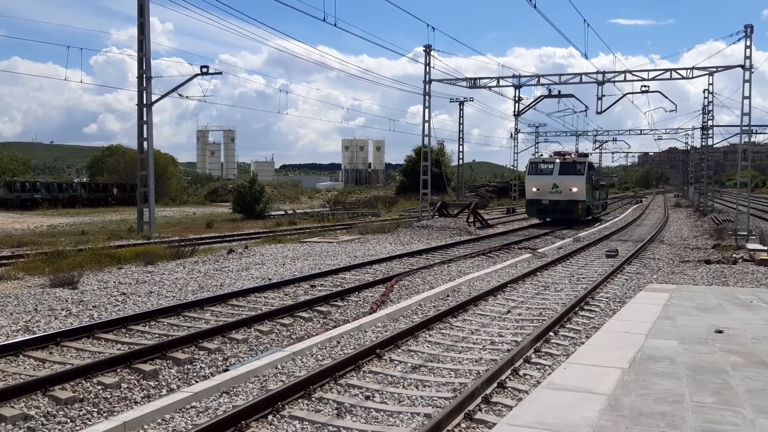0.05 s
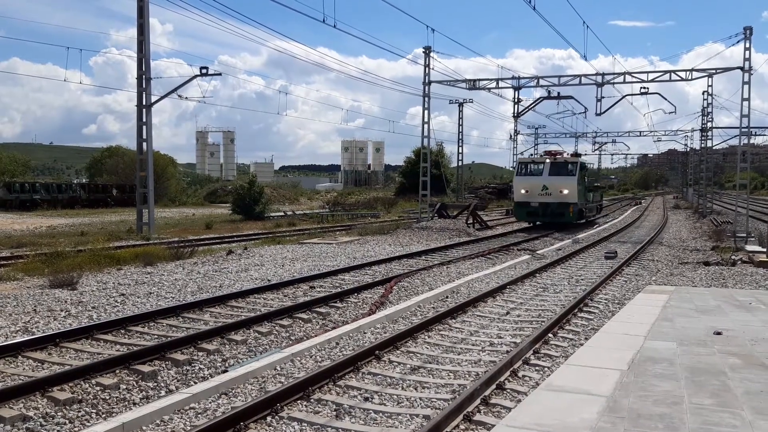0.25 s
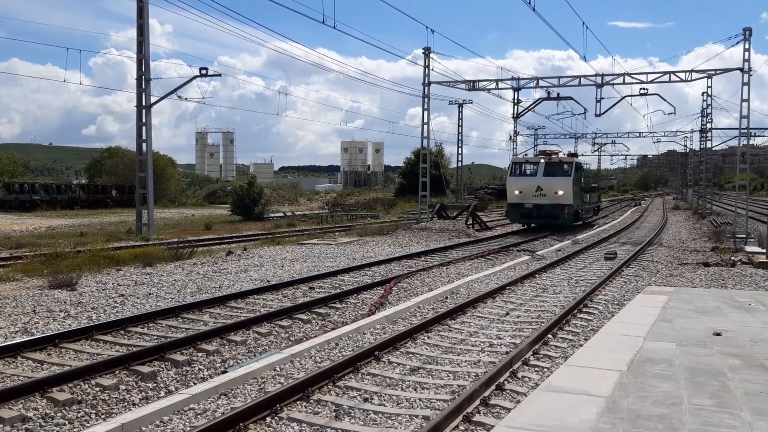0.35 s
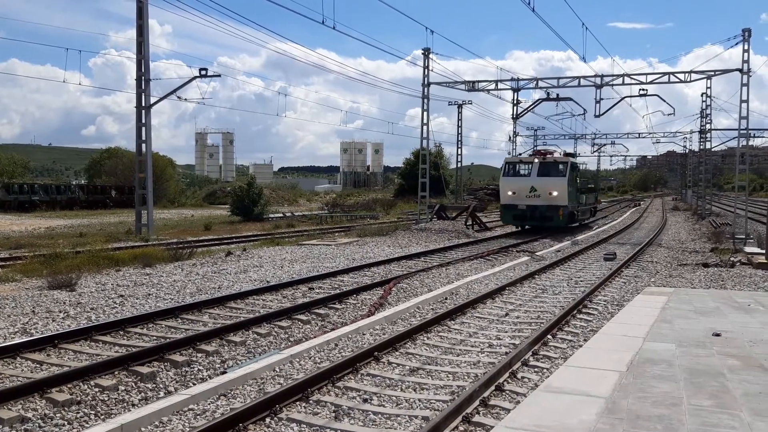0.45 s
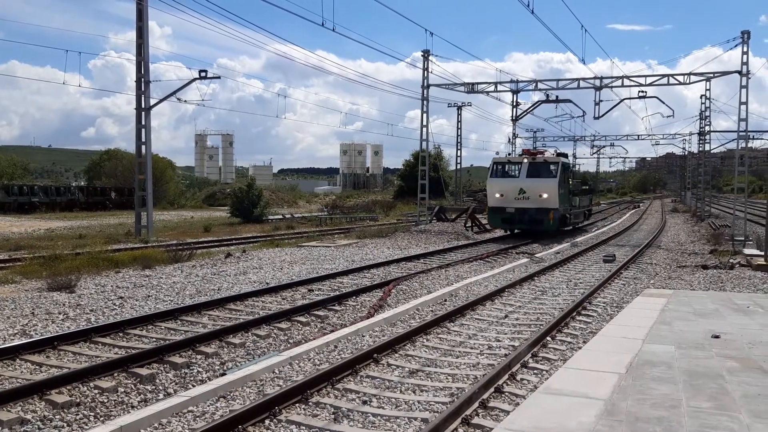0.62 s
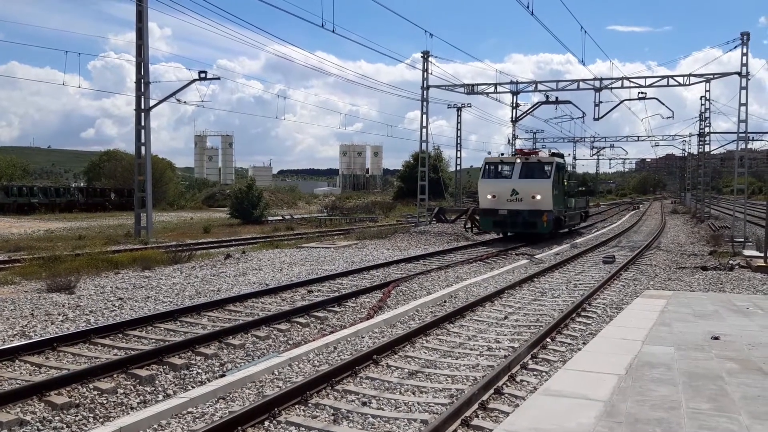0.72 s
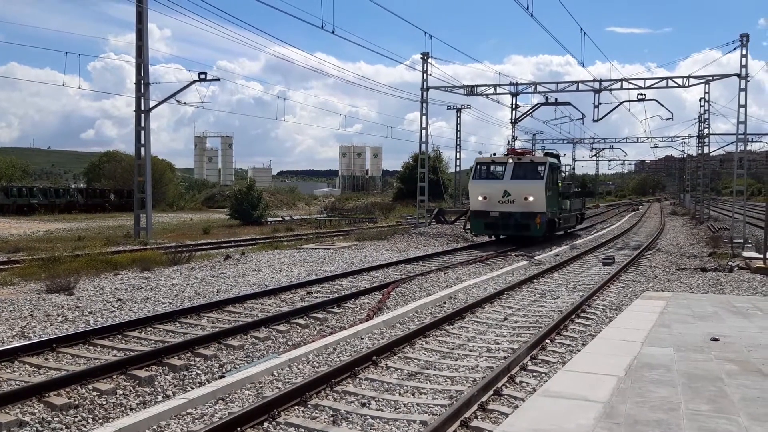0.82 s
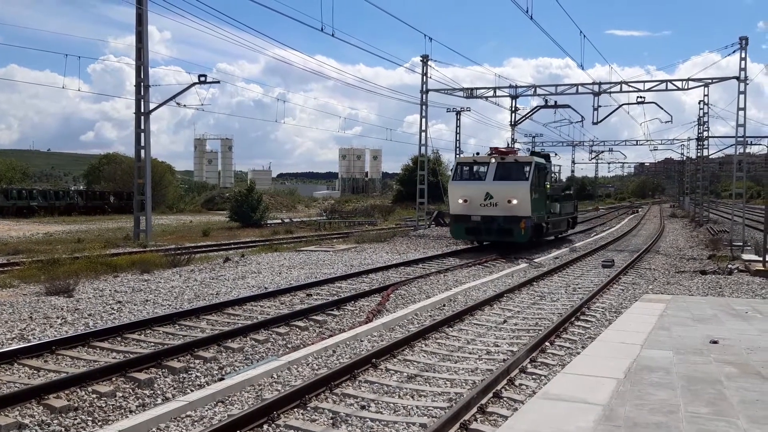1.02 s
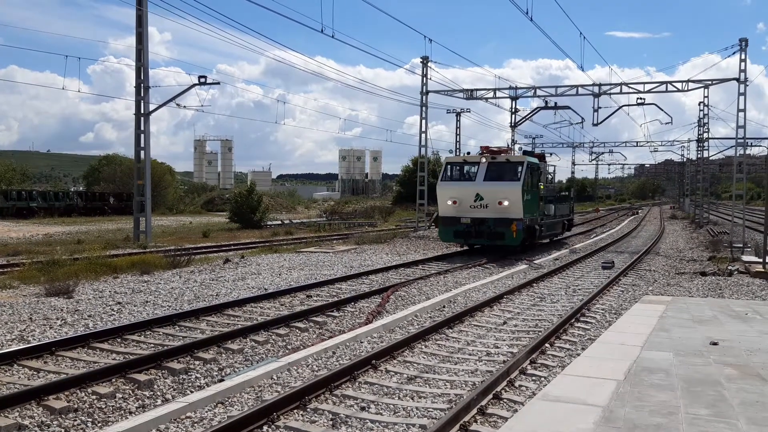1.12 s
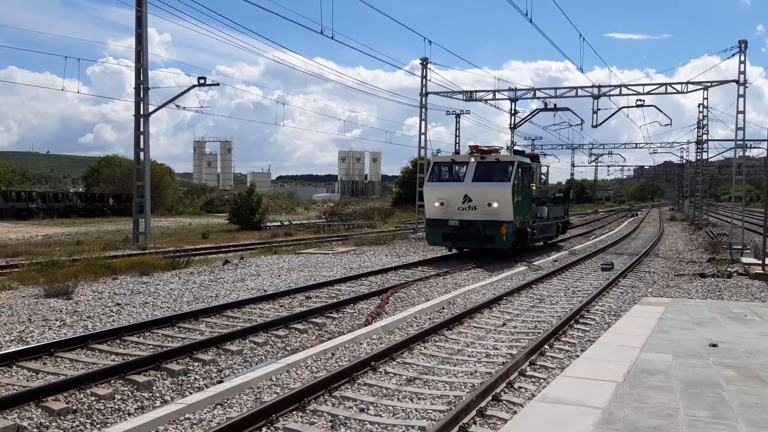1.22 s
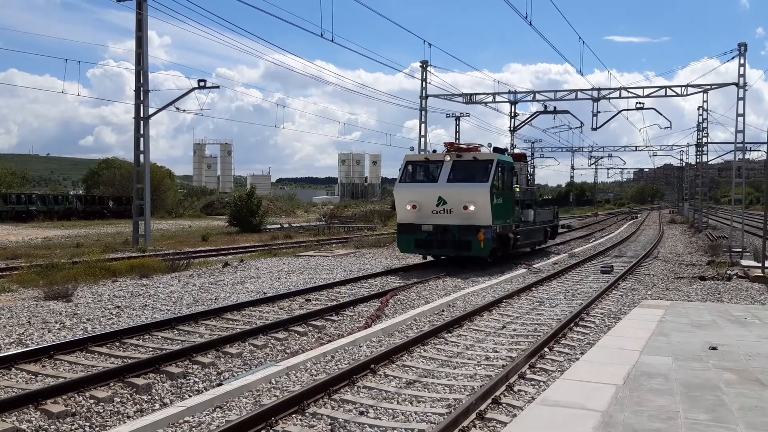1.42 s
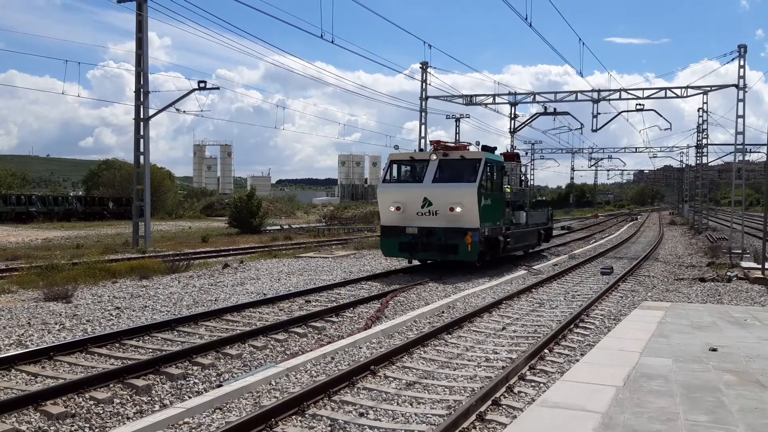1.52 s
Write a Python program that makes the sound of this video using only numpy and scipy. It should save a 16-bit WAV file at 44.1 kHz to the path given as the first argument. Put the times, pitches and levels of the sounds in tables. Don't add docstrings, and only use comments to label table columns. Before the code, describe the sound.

A rail vehicle's air horn sounds one short, loud, reedy blast over low engine hum and wheel hiss, after a faint earlier echo; its dull reverberation fades across the open yard while wind buffets the stereo microphone.

```python
import sys
import numpy as np
from scipy import signal
from scipy.fft import rfft, irfft
from scipy.io import wavfile
from scipy.ndimage import uniform_filter1d

SR = 44100
rng = np.random.default_rng(int(sys.argv[2]) if len(sys.argv) > 2 else 0)


def master_out(mix):
    frames = np.transpose(np.atleast_2d(mix))
    ceiling = np.clip(frames, -1, 1)
    pcm = np.round(ceiling * 32767).astype(np.int16)
    wavfile.write(sys.argv[1], SR, pcm)


def magnitude_from_level(level_db):
    exponent = np.asarray(level_db, float) / 20
    return 10 ** exponent


N = 68355
T = np.arange(-SR, N) / SR
HEARD_T = T[SR:]

# time in seconds, wheel hiss in dB, engine in dB.
APPROACH = [(0, -3, -8.5), (.2, 1, -4), (.4, -3, -9), (.62, 3, 0), (.72, 4, 3.5), (.85, 1, -1.5),
            (1.0, 1, 1.5), (1.1, -1.5, 0.5), (1.18, -1.5, -3), (1.28, 2.5, 0), (1.55, 4, 1.5)]


def drift(hz, size):
    r, run_in = np.exp(-2 * np.pi * hz / SR), 8000
    x = signal.lfilter([1], [1, -2 * r, r * r], rng.standard_normal(size + run_in))[run_in:]
    return (x - x.mean()) / x.std()


def along(rows, t):
    s, *columns = np.transpose(rows)
    return [np.interp(t, s, column) for column in columns]


def both_ports(left_db, right_db):
    return magnitude_from_level([[left_db], [right_db]])


def lowpass(order, hz, x):
    return signal.sosfilt(signal.butter(order, hz, fs=SR, output="sos"), x)


def horn(delay=0, ratio=1, direct=0, count=7):
    # time in seconds, pitch in Hz, pressure in dB.
    air_supply = [
        (.198, 708.7, -31),
        (.212, 708.4, -5.5),
        (.232, 721.4, -1.5),
        (.27, 709.4, -1),
        (.42, 706.7, -1),
        (.5, 711, -3),
        (.57, 722.4, -8.5),
        (.62, 725, -14),
        (.675, 665.7, -30),
    ]
    # multiple of the pitch, left in dB,
    # right in dB, steered share 0-1.
    partials = [(1, -12, -6.5, 0.47), (2, -16, -23, .8), (3, -13.5, -1.5, 0.52), (4, -25, -16.5, .1),
                (5, -21, -20.5, 0.7), (6, -30, -17.5, 0.07), (7, -26, -13, 0.27),
                (8, -28, -12, 0), (9, -47, -38, 0), (10, -40, -50, 0), (11, -36, -46, 0),
                     (12, -47, -74, 0), (13, -48, -55, 0), (14, -51, -47, 0), (15, -46, -47, 0),
                     (16, -46, -42, 0), (17, -48, -39, 0), (18, -50, -39, 0), (19, -52, -40, 0),
                     (20, -53, -45, 0), (21, -54, -51, 0), (22, -56, -51, 0)]
    # time in seconds, left in dB, right in dB.
    steering = [(.205, 9.5, -43), (.22, 1, -58), (.245, 1.5, -11), (.28, 2.5, -3), (.33, -2.5, 0),
                (.6, 5, 4)]
    # multiple of the pitch, fade in dB per second.
    ground_fades = [(4, 2), (5, -1), (6, 31.5), (7, 14), (8, 10), (9, 7), (10, 59), (12, 28), (14, 73)]
    # multiple of the pitch, left in dB, right in dB, fade in dB per second.
    side_tones = [(1.25, -56, -35, 50.5), (1.75, -40.5, -36.5, 9), (2.25, -49, -51, 17.5),
                  (2.75, -37, -50, 19), (3.25, -42.5, -45, 25)]
    left_lag_rad, high_partials_db, flutter_wide_hz = 0.37, -1, 23.8

    t = (T - delay - .2) * ratio + .2
    end_s = air_supply[-1][0] + .05
    live = (t > air_supply[0][0]) & (t < end_s)
    t, size = t[live], live.sum()
    hz, pressure_db = along(air_supply + [(end_s, 715, -70)], t)
    phase = 2 * np.pi * np.cumsum(hz * ratio) / SR
    rough = 0.011 + 0.031 * np.exp(-((t - .228) / .02) ** 2)
    steer_db = np.array(along(steering, t)) * direct
    out = np.zeros((2, size))

    for k, left_db, right_db, share in (partials)[:count]:
        if k == 1:
            dull = 1
        elif k > 8:
            dull = 2.2
        else:
            dull = 2.55 + 0.52 * np.log2(k / 2)
        fade_db = sum(rate for multiple, rate in ground_fades if multiple == k) * (t - .35)
        partial_db = dull * pressure_db - fade_db + high_partials_db * (k > 7)
        waver_db = .4 + .8 * np.log2(k) * (k != 3)
        start = rng.uniform(0, 2 * np.pi)
        air = 1 + rough * k ** 1.23 * drift(278, size)
        for c, side_db in enumerate((left_db, right_db)):
            level = magnitude_from_level(side_db + partial_db + waver_db * drift(9, size) + share * steer_db[c]) * 2 ** .5
            lag = left_lag_rad * (1 - c) * k ** .5
            out[c] += level * air * np.sin(k * phase + start - lag)

    if direct:
        for k, left_db, right_db, fade_db in side_tones:
            tone = drift(flutter_wide_hz, size) * np.sin(k * phase)
            tone += drift(flutter_wide_hz, size) * np.cos(k * phase)
            out += tone * magnitude_from_level(1.2 * pressure_db - fade_db * (t - 0.326)) * both_ports(left_db, right_db)
    full = np.zeros((2, len(T)))
    full[:, live] = out
    return full


def yard(x):
    t60_s, rise_s, cut_hz, tail_db = 1.78, 0.022, 2050, -27.5
    t = np.arange(int(1.5 * SR)) / SR
    tail = rng.standard_normal((2, len(t))) * magnitude_from_level(-60 * t / t60_s) * np.minimum(t / rise_s, 1)
    tail = lowpass(1, cut_hz, tail)
    tail /= np.sqrt(np.sum(tail ** 2, axis=1, keepdims=True))
    return magnitude_from_level(tail_db) * signal.fftconvolve(x, tail, axes=1)[:, :len(T)]


def horn_in_yard():
    # delay in seconds, pitch ratio, left in dB, right in dB.
    near_echoes = [
        (.04, .965, -30, -27),
        (.11, .970, -25, -17),
    ]
    # delay in seconds, pitch ratio, left in dB, right in dB.
    far_wall = (.42, .978, -22, -27)
    in_line_s, in_line_wide_s = 0.926, 0.037
    echo_cut_hz, behind_ratio = 1230, .975
    earlier_s, earlier_db = 1, 1.5

    echoes = np.zeros((2, len(T)))
    for delay, ratio, left_db, right_db in near_echoes:
        echoes += horn(delay, ratio, count=3) * both_ports(left_db, right_db)
    delay, ratio, left_db, right_db = far_wall
    in_line = np.exp(-((T - in_line_s) / in_line_wide_s) ** 4)
    echoes += horn(delay, ratio, count=1) * both_ports(left_db, right_db) * in_line

    plain = horn(count=9)
    behind = lowpass(2, echo_cut_hz, horn(0, behind_ratio, count=3))
    earlier = magnitude_from_level(earlier_db) * np.roll(plain, -int(earlier_s * SR), axis=1)
    direct = horn(direct=1, count=22)
    return (direct + lowpass(2, echo_cut_hz, echoes) + yard(plain + behind + earlier))[:, SR:]


def hiss():
    # frequency in Hz, level in dB per Hz.
    left_body = [(40, -73), (120, -69), (700, -84), (1060, -89), (1400, -86), (2500, -93.5), (6500, -98.5),
                 (8200, -111)]
    left_treble = [(6000, -130), (8500, -112), (12500, -112), (15700, -125)]
    # frequency in Hz, level in dB per Hz.
    right_body = [(40, -76), (200, -72.5), (720, -71.5), (1060, -88), (2100, -74.5), (3700, -91),
                  (5300, -77.5), (6900, -104)]
    right_treble = [(7000, -108), (8000, -138), (9300, -119), (12500, -102), (15700, -114)]
    patchy_db = .7
    hz = np.arange(N // 2 + 1) * SR / N + 1

    def shape(curve):
        curve_hz, db = np.transpose(curve)
        return magnitude_from_level(np.interp(np.log(hz), np.log(curve_hz), db, -160, -160))

    alike = 0.34 * np.exp(-(hz / 5000) ** 2)
    both, left, right = rfft(rng.standard_normal((3, N))) * np.sqrt(SR / 2)
    ports = np.sqrt(alike) * both + np.sqrt(1 - alike) * np.array([left, right])
    ports *= [shape(left_body) + shape(left_treble), shape(right_body) + shape(right_treble)]
    out = np.zeros((2, N))
    place = 2 * np.log2(hz / 30)
    shared = drift(1.9, N)
    for k in range(20):
        band = np.cos(np.pi / 2 * np.clip(place - k, -1, 1)) ** 2
        flicker_db = patchy_db * (.5 * shared + drift(12, N))
        out += irfft(ports * band, N) * magnitude_from_level(flicker_db)
    hiss_db, _ = along(APPROACH, HEARD_T)
    return out * magnitude_from_level(hiss_db)


def engine():
    firing_hz = 72 + 1.8 * drift(4.3, N)
    tone = np.sin(2 * np.pi * np.cumsum(firing_hz) / SR) * 2 ** .5
    _, engine_db = along(APPROACH, HEARD_T)
    return tone * magnitude_from_level(engine_db + 1.5 * drift(2.5, N)) * both_ports(-33.5, -47.5)


def wind():
    # time in seconds, level in dB, left over right in dB.
    gusts = [(0.0, -42, 3), (0.154, -43, 5), (0.198, -49.5, 29.5), (0.276, -48.5, 6), (0.328, -44, 14.5),
             (0.4, -52.5, 5), (0.444, -44, 20.5), (0.56, -52, 21), (0.702, -33.5, 1), (0.784, -36, 12.5),
             (0.84, -32.5, -5), (0.928, -42.5, 22.5), (0.948, -43, 10), (1.04, -40, 24.5),
             (1.112, -37, -8.5), (1.148, -27, 1.0), (1.194, -45.5, 3), (1.55, -45, 11)]
    low_hz, high_hz, bright_hz = 83.3, 214, 700
    lump_db, bright_per_db, wind_db = 2.5, .02, 2
    rumble_cut = signal.butter(3, low_hz, "high", fs=SR, output="sos")
    db, pan_db = along(gusts, HEARD_T)
    out = np.zeros((2, N))
    for c, side_db in enumerate((pan_db / 2, -pan_db / 2)):
        gust_db = db + side_db + lump_db * 2 * np.tanh(drift(42, N) / 2)
        white = signal.sosfilt(rumble_cut, rng.standard_normal((2, N)))
        low = lowpass(2, high_hz, white[0])
        high = lowpass(6, bright_hz, white[1])
        bright = np.clip(bright_per_db * (gust_db + 45), 0, 1.5)
        out[c] = magnitude_from_level(gust_db + wind_db) * (low / low.std() + bright * high / high.std())
    return out


def buffets():
    # time in seconds, left in dB, right in dB, length in seconds.
    eddies = [
        (0.798, -39, -52, 0.0099),
        (0.829, -56, -25, 0.012),
        (1.016, -41, -52, 0.03),
        (1.151, -26.5, -36, 0.011),
        (1.179, -26.5, -53, 0.0053),
        (1.24, -34.5, -58, 0.015),
    ]
    band = signal.butter(2, [90, 444], "band", fs=SR, output="sos")
    noise = signal.sosfilt(band, rng.standard_normal((2, N)))
    puffs = np.zeros((2, N))
    for s, left_db, right_db, length in eddies:
        puffs += both_ports(left_db, right_db) * np.exp(-((HEARD_T - s) / length) ** 2)
    return puffs * noise / noise.std()


def scene():
    return horn_in_yard() + hiss() + engine() + wind() + buffets()


def top_cut(x):
    return signal.sosfilt(signal.butter(12, 15820, fs=SR, output="sos"), x)


def record(dry):
    right_dip_hz = [6900, 10200]
    duck_from_db, duck_share, attack_s, release_db_per_s = -21.5, 0.34, 0.032, 24
    peak_limit = .95

    power = uniform_filter1d(np.mean(dry ** 2, axis=0), size=441)
    db = 10 * np.log10(power + 1e-12)
    release_db = release_db_per_s * HEARD_T
    held_db = np.maximum.accumulate(db + release_db) - release_db
    duck_db = duck_share * np.maximum(held_db - duck_from_db, 0)
    r = np.exp(-1 / (attack_s * SR))
    x = dry * magnitude_from_level(-signal.lfilter([1 - r], [1, -r], duck_db))
    x = x / (1 + (x / peak_limit) ** 10) ** .1
    dip = signal.butter(1, right_dip_hz, "bandstop", fs=SR, output="sos")
    x = np.array([x[0], signal.sosfilt(dip, x[1])])
    return top_cut(x)


dry = scene()
out = record(dry)
master_out(out)
```